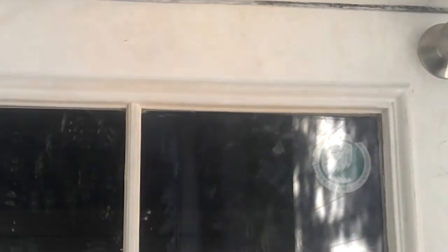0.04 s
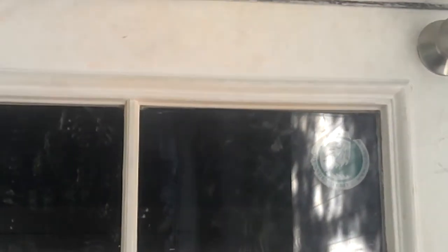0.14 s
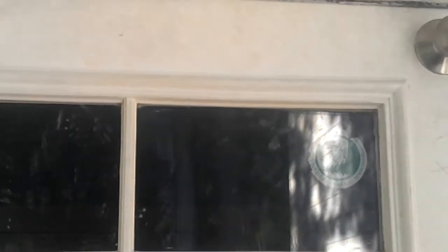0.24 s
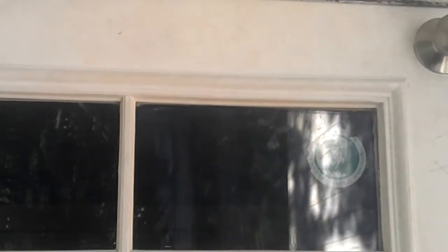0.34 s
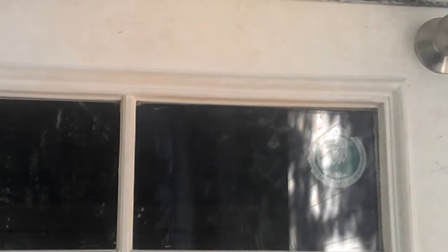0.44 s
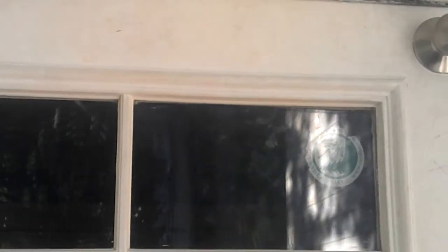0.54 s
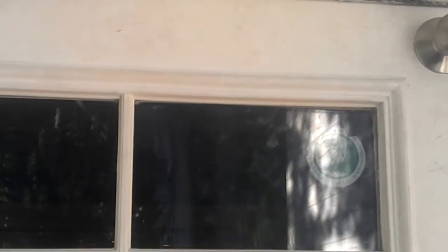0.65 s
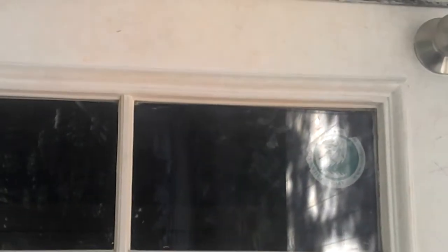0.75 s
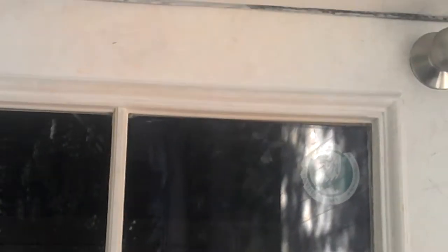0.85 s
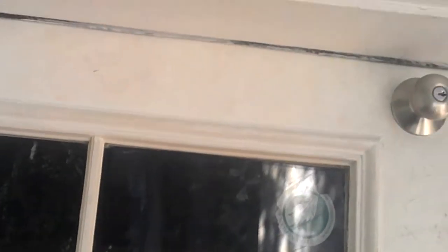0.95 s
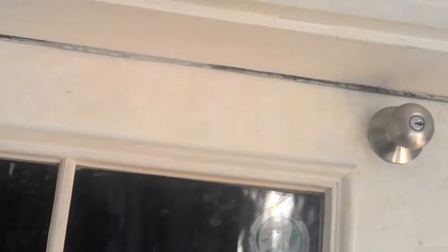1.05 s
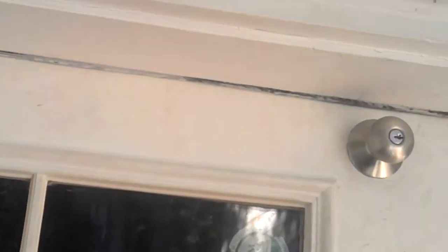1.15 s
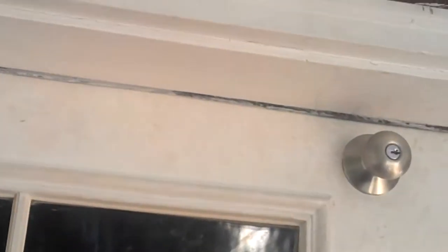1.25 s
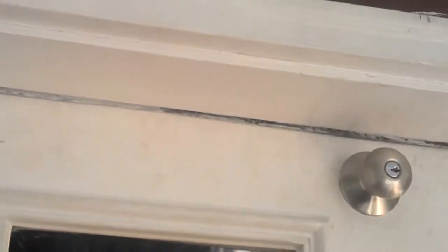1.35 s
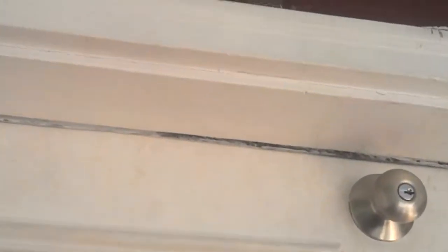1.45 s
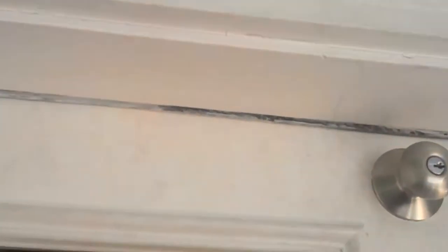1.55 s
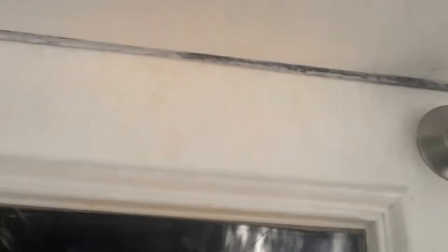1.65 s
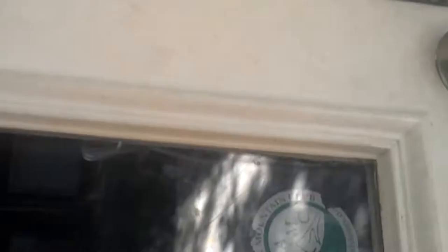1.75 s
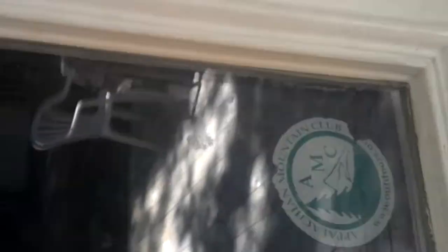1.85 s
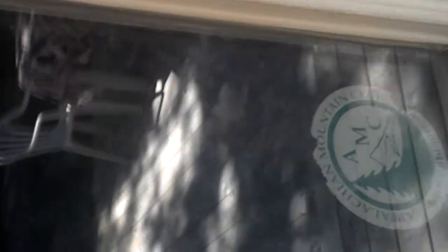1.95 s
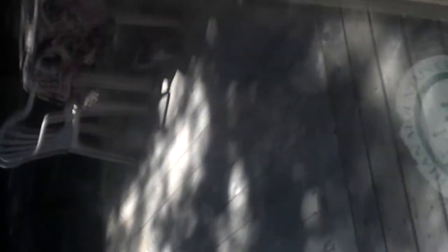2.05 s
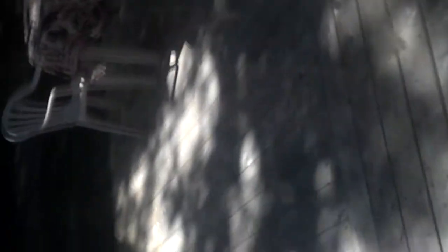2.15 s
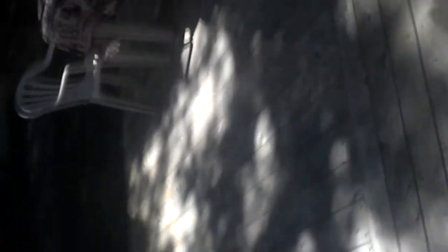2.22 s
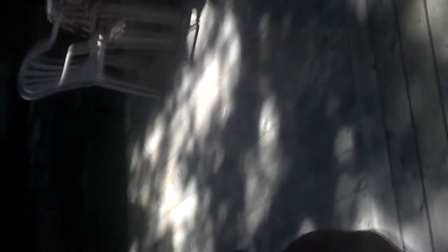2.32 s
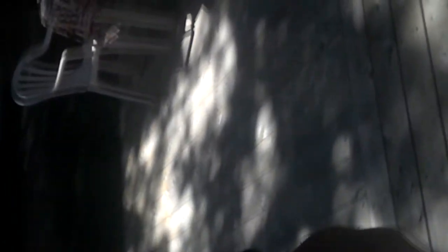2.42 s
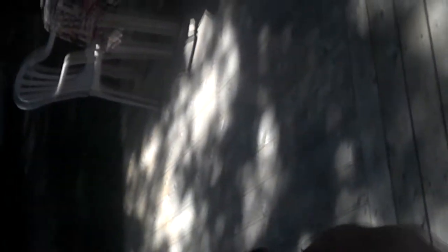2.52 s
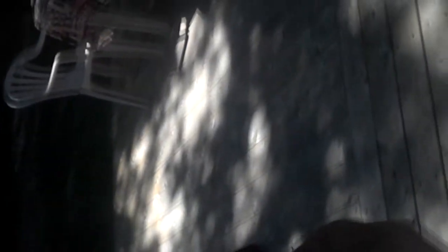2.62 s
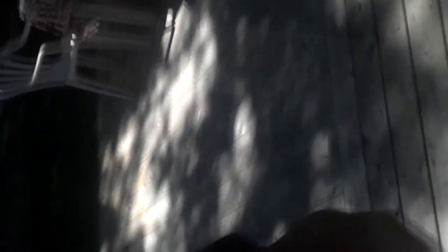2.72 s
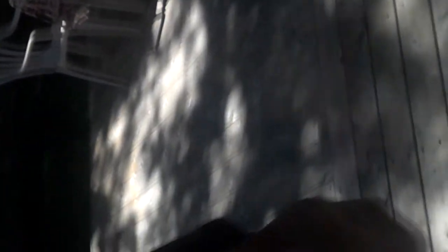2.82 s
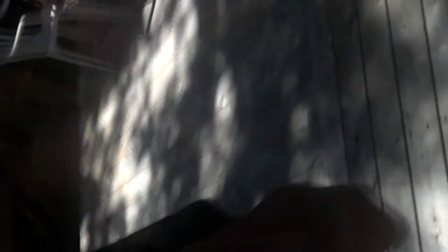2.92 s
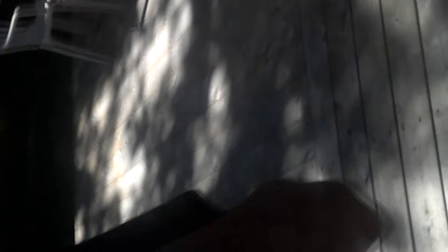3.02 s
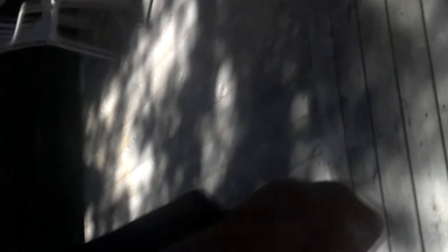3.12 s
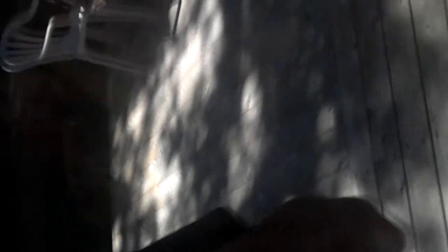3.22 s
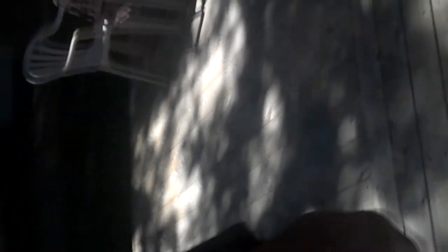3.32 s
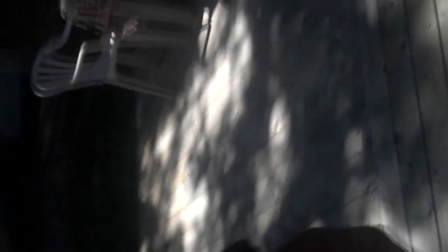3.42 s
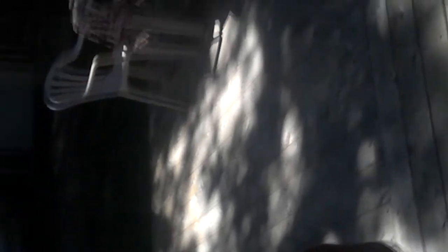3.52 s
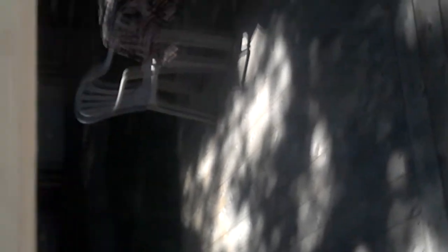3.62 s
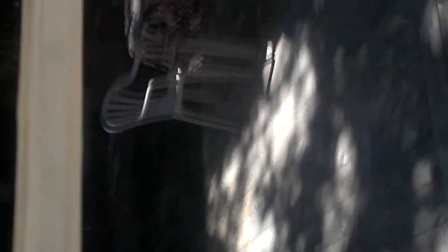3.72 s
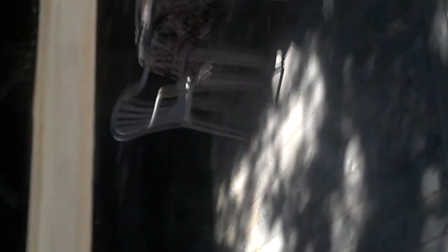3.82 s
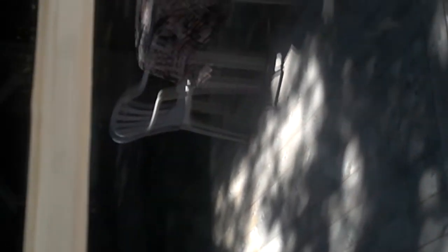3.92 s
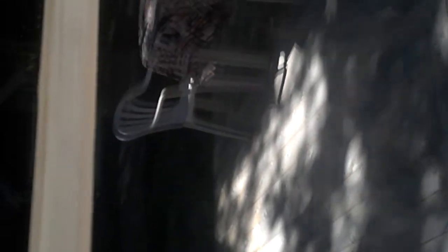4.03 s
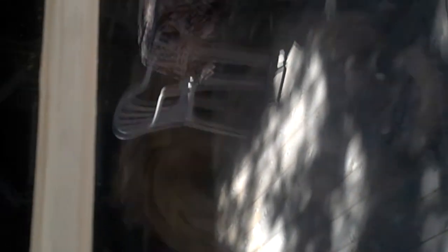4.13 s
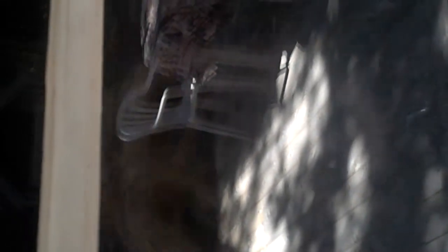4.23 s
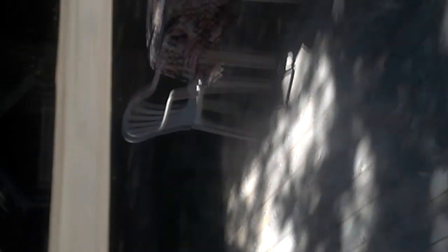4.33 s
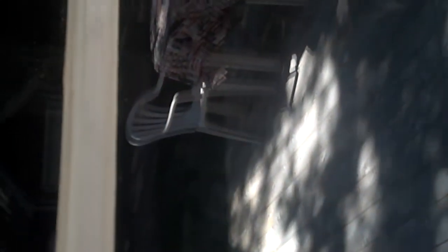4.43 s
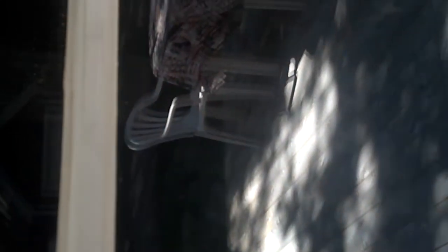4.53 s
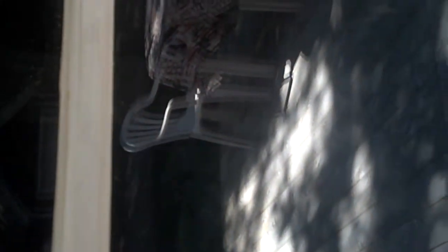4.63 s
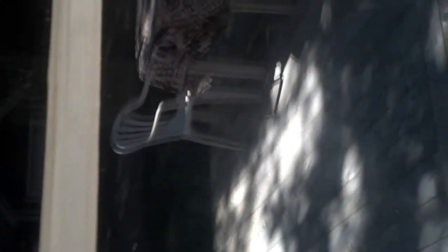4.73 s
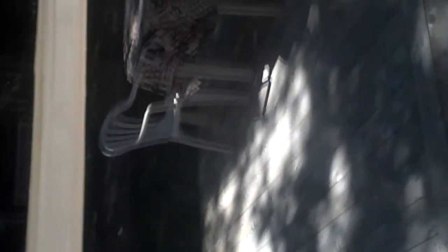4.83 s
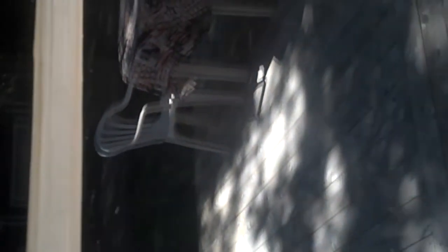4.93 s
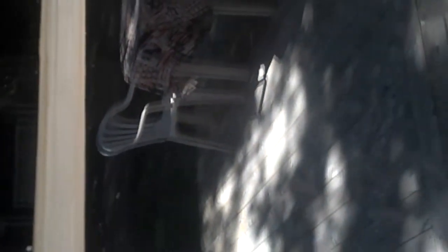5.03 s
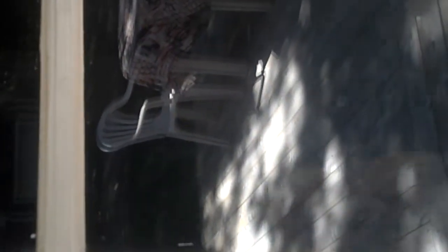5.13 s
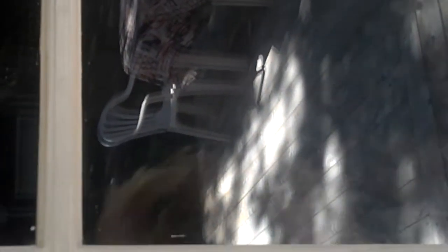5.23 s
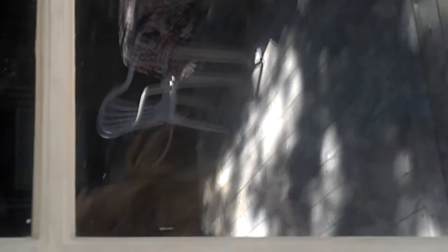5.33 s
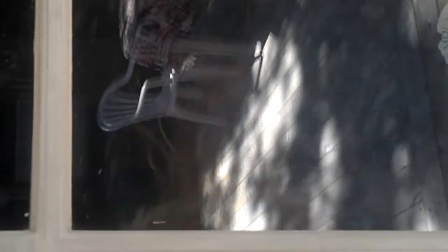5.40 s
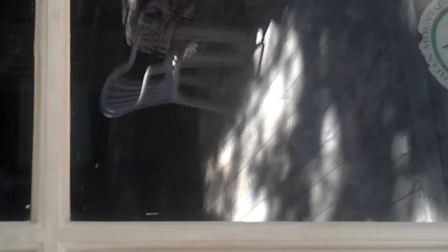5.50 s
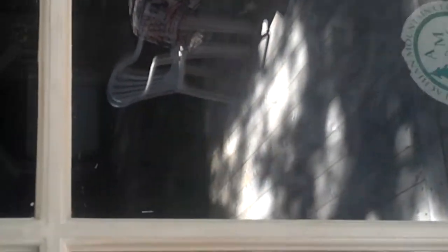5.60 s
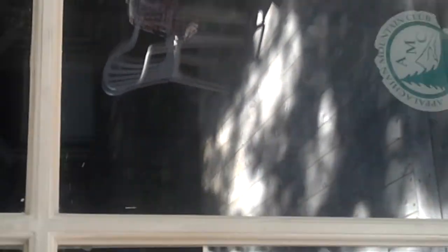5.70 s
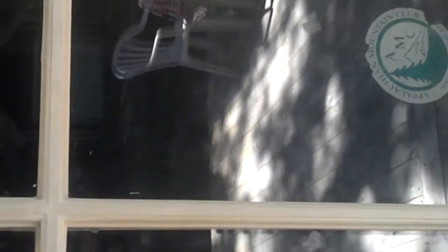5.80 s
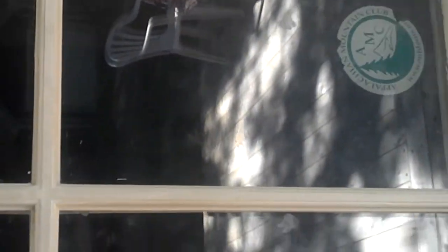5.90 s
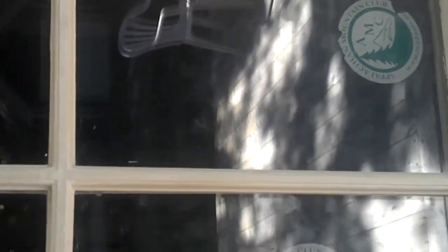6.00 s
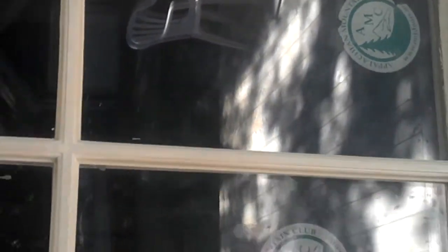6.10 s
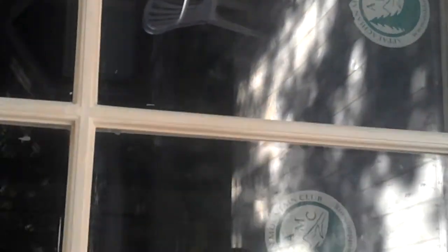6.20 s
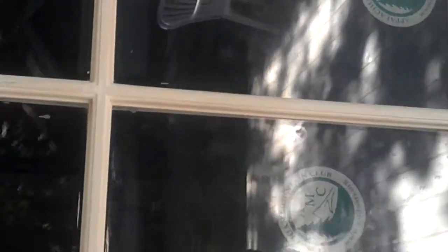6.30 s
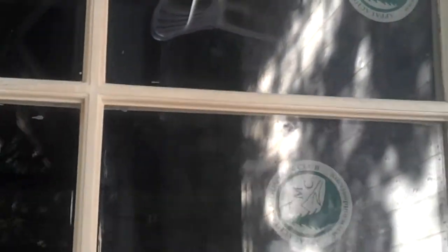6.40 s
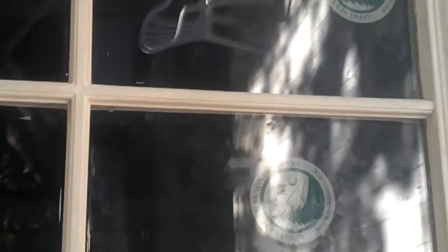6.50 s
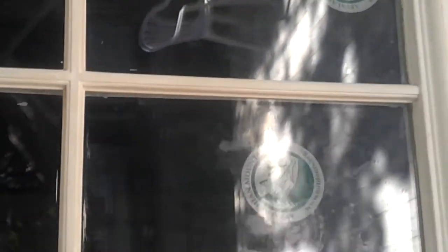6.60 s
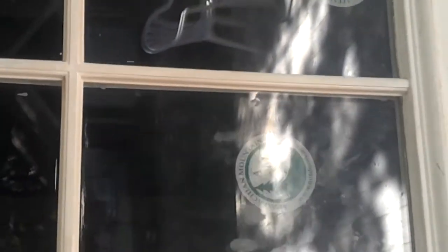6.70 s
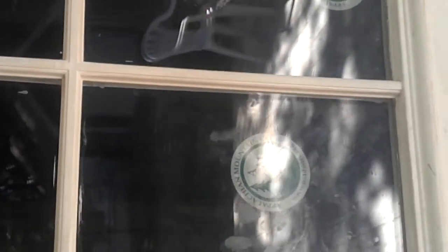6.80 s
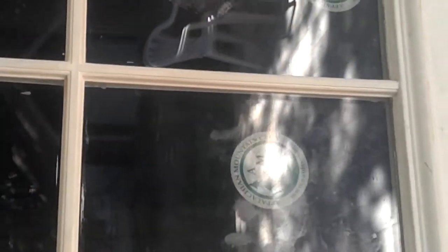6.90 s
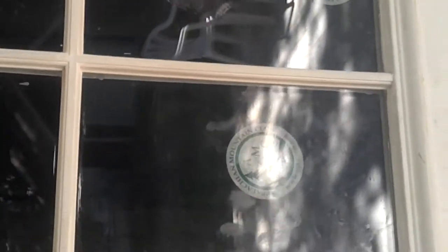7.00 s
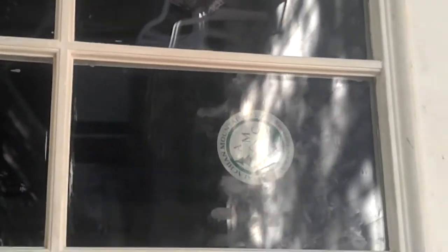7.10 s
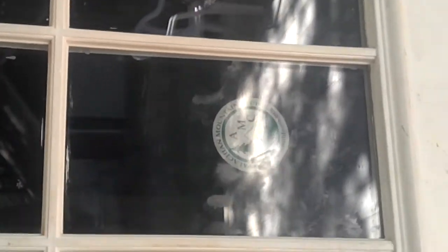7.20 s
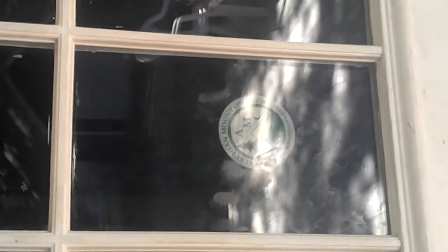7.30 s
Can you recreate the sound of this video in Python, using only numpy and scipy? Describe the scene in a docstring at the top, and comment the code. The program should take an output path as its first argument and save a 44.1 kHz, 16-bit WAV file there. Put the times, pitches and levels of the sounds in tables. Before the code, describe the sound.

A faint, low house rumble runs throughout in a bare room. At about 1.5 seconds a dog's paws thump against a glass-paned door close to the microphone, followed at 1.8 by one short, clear yip with a little room echo. From 2.1 to 2.7 claws click sharply and scrape on glass and wood, with two small whimpers. More scrabbling and dull thumps run from 2.8 to 3.9, starting with a brief pad squeak, and another sharp burst comes from 4.2 to 4.5. Collar tags tinkle very faintly in the pause. From 5.1 to 6.4 comes the longest bout: heavy thumps, claw strikes, dragging scratches that rattle the pane, and a few quick squeaks on the glass. The dog whimpers softly at 6.6, then gives two faint, thin nose whistles and a small high whine between 6.9 and 7.4 seconds.

```python
"""A bare room with a glass-paned door. A dog jumps at it: paws thump, claws strike and drag down pane
and wood, pads squeak on the glass. The dog yips and whines from the throat, its metal collar tags
tinkle, and it whistles thinly through the nose, over the low rumble of the house. The camera widens
its stereo by feeding each microphone port, inverted and slightly late, into the other channel."""
import sys
import numpy as np
from scipy import signal
from scipy.fft import rfft, irfft, next_fast_len
from scipy.io import wavfile
from scipy.ndimage import map_coordinates

SR = 44100
rng = np.random.default_rng(int(sys.argv[2]) if len(sys.argv) > 2 else 0)


def master_out(mix):
    """Clip the mix to full scale and print it as 16-bit PCM to the path in sys.argv[1]."""
    frames = np.transpose(np.atleast_2d(mix))
    ceiling = np.clip(frames, -1, 1)
    pcm = np.round(ceiling * 32767).astype(np.int16)
    wavfile.write(sys.argv[1], SR, pcm)


N = 324132

# glass pane resonances: (centre [Hz], width [Hz], gain [dB])
PANE_MODES = [(1028, 145, -1), (1440, 270, 0), (1864, 290, 4), (2344, 646, 0.5), (4120, 1550, -8)]
# door body resonances: (centre [Hz], width [Hz], gain [dB])
DOOR_MODES = [(129.6, 77, -2.5), (241, 97, 1.5), (435, 242, 1.5), (775, 984, -3)]
# hiss of claw on glass, also of breath: (frequency [Hz], gain [dB])
HISS_SPECTRUM = [(1500, -76), (2800, -5), (4000, -6), (6000, -6), (9000, -15.5), (17000, -31.5)]


def amp(db):
    """Gain of a level in dB."""
    return 10 ** (np.asarray(db) / 20)


def unit(x):
    """x at rms 1."""
    return x / np.sqrt(np.mean(x ** 2) + 1e-20)


def along(points, hz):
    """Interpolate (frequency [Hz], value) points on a log axis."""
    f, v = np.transpose(points)
    return np.interp(np.log(hz + 1), np.log(f + 1), v)


def curves(tables, fade_s=0.0065):
    """A gate open during each table, then each column per sample."""
    t = np.arange(N) / SR
    times, *cols = np.vstack(tables).T
    gate = sum(np.clip(np.minimum(t - rows[0][0], rows[-1][0] - t) / fade_s + 1, 0, 1) for rows in tables)
    return [gate] + [np.interp(t, times, col) for col in cols]


def wobble(knots_per_s):
    """Smooth random curve."""
    knots = rng.standard_normal(int(N * knots_per_s / SR) + 4)
    return map_coordinates(knots, [np.arange(N) * knots_per_s / SR])


def filtered(x, response):
    """x through a complex frequency response."""
    m = next_fast_len(x.shape[-1] + 8192)
    return irfft(rfft(x, m) * response(np.fft.rfftfreq(m, 1 / SR)), m)[..., :x.shape[-1]]


def modes(table):
    """Response of a row of resonances; a heavy body hardly answers far above its top one."""
    top_hz = 1.55 * table[-1][0]
    return lambda f: sum((-1) ** k * amp(db) * 1j * f * width / (hz * hz - f * f + 1j * f * width + 1e-9)
                         for k, (hz, width, db) in enumerate(table)) / (1 + 1j * f / top_hz)


def colour(points):
    """Response of a smooth spectrum."""
    return lambda hz: amp(along(points, hz))


def port_noise():
    """Noise at the two ports: alike in the low mids, unrelated in the treble."""
    # (frequency [Hz], power common to both ports [0-1])
    coherence = [(70, 0.12), (250, 0.9), (600, 0.69), (1000, 0.17), (3000, 0.0057)]

    def split(hz):
        share = np.clip(along(coherence, hz), 0, 1)
        return np.sqrt([share, 1 - share, 1 - share])
    common, *own = filtered(rng.standard_normal((3, N)), split)
    return common + np.array(own)


def room_tone():
    """Steady low rumble and hiss of the house."""
    # (frequency [Hz], gain [dB])
    spectrum = [(35, -4), (70, -10), (130, -2.5), (250, -2.5), (500, -12.5), (1000, -19), (2000, -23.5),
                (5000, -27.5), (15000, -37.5), (15600, -64)]
    return amp(-59.0 + 0.11 * wobble(0.82)) * unit(filtered(port_noise(), colour(spectrum)))


def thumps():
    """Pads and body hit door and floor: a few low cycles that die at once."""
    # (time [s], level [dB], pitch [Hz])
    blows = [(1.514, -22.5, 167), (1.651, -31.5, 166), (2.972, -28, 143), (3.45, -22, 194),
             (3.582, -26.5, 220), (3.828, -24, 231), (3.844, -27.5, 202), (4.533, -27.5, 240),
             (4.915, -28, 228), (5.102, -33, 178), (5.136, -26.5, 131), (5.175, -20.5, 123),
             (5.241, -16, 138), (5.341, -28.5, 106), (5.374, -29.5, 121), (5.583, -20, 170),
             (6.066, -20.5, 283)]
    t60_cycles, rise_s = 8, 0.002
    out, t = np.zeros(N + SR), np.arange(SR // 5) / SR
    for s, db, hz in blows:
        envelope = amp(db - 60 * t * hz / t60_cycles) * (1 - np.exp(-t / rise_s))
        out[round(s * SR):][:len(t)] += envelope * np.sin(2 * np.pi * hz * t)
    return out[:N]


def paw_drag():
    """Pads and claws stick and slip: lumpy friction shakes pane and door and hisses."""
    # (start [s], length [s], pane [dB], claw hiss [dB], door [dB])
    strokes = [(1.548, 0.39, -72.5, -94, -64), (2.149, 0.043, -36.5, -42.5, -41.5),
               (2.209, 0.14, -71, -52, -48), (2.307, 0.25, -45, -45, -58.5), (2.844, .13, -44.5, -51, -52),
               (3.091, 0.049, -49.5, -57, -54.5), (3.17, 0.19, -48, -61.5, -50.5),
               (3.273, 0.061, -43, -44.5, -50.5), (3.321, 0.066, -73, -79, -39.5),
               (3.408, 0.048, -36.5, -46, -44.5), (3.493, 0.066, -45.5, -46, -48),
               (3.552, 0.038, -38.5, -43, -37), (3.587, 0.032, -38, -41.5, -45.5),
               (3.68, 0.081, -58, -59, -50), (4.192, 0.041, -45.5, -45.5, -48),
               (4.228, 0.067, -42, -74.5, -44), (4.336, 0.086, -41, -46.5, -48),
               (4.389, 0.097, -38, -43.5, -45.5), (4.682, 0.13, -66.5, -65, -61),
               (5.29, 0.24, -59, -59.5, -56), (5.478, 0.085, -41, -42, -45.5),
               (5.549, 0.12, -34, -39.5, -38), (5.668, 0.057, -44, -41.5, -36.5),
               (5.711, 0.18, -41, -74, -48), (5.886, 0.08, -42, -66, -51), (5.951, 0.19, -39.5, -56, -45.5),
               (6.078, 0.1, -41.5, -64, -41.5), (6.15, 0.16, -44, -64, -50), (6.269, 0.16, -43, -49, -42)]
    build_share, squareness = 0.44, 1.85
    snags_per_s, snag_s = 250, .002
    t = np.arange(N) / SR
    pressure = np.zeros((3, N))
    for start, length, *db in strokes:
        at = slice(round(start * SR), round((start + length) * SR))
        from_peak = np.interp(t[at] - start, [0, build_share * length, length], [-1, 0, 1])
        pressure[:, at] += amp(db)[:, None] * (1 - abs(from_peak) ** squareness)
    snags = (rng.random(N) < snags_per_s / SR) * rng.exponential(size=N)
    jerks = 1 + .36 * signal.lfilter([1], [1, -np.exp(-1 / (snag_s * SR))], snags)
    slips = jerks * amp(0.99 * wobble(90) + 1.2 * wobble(400)) * port_noise()

    def shaken(body, waver_db):  # the sliding paw wakes each resonance unevenly
        return sum((-1) ** k * amp(waver_db * wobble(25)) * filtered(slips, modes([mode]))
                   for k, mode in enumerate(body))
    ring = shaken(PANE_MODES, waver_db=2.2)
    rasp = filtered(amp(1.2 * wobble(820)) * slips, colour(HISS_SPECTRUM))
    rumble = shaken(DOOR_MODES, waver_db=3)
    return sum(p * unit(layer) for p, layer in zip(pressure, (ring, rasp, rumble)))


def claw_strikes():
    """A claw lands: sharp click, short rattle of the pane, duller knock of the door."""
    # (time [s], click [dB], pane [dB], door [dB])
    strikes = [(1.649, -89, -70, -47.5), (1.9233, -46, -41, -45), (1.957, -53, -47.5, -41),
               (2.1594, -31.5, -32, -60), (2.2147, -32.5, -34, -37), (2.4865, -15.5, -26.5, -31),
               (2.494, -25, -24.5, -39.5), (2.5572, -30, -46, -35), (2.631, -45, -43.5, -37.5),
               (2.8927, -65, -41, -28.5), (3.012, -63, -52.5, -49.5), (3.112, -43, -42.5, -55),
               (3.353, -60, -41.5, -39.5), (3.421, -40, -32, -43), (3.429, -53, -36.5, -42),
               (3.472, -50, -36.5, -39), (3.498, -45, -30.5, -42), (3.5605, -35.5, -32.5, -48),
               (3.7038, -44, -54, -62), (3.8272, -49.5, -57, -42.5), (3.9106, -83, -86, -43.5),
               (4.1953, -23, -60, -44), (4.2344, -38, -33, -35.5), (4.256, -11.5, -32.5, -64),
               (4.289, -38, -67, -56), (4.329, -35.5, -42.5, -45.5), (4.369, -36.5, -36, -51),
               (4.4008, -25.5, -41, -20), (4.443, -31.5, -40, -41), (4.525, -50, -57, -44.5),
               (4.9225, -46.5, -60, -55.5), (5.1613, -28, -33, -36.5), (5.221, -22.5, -38, -42.5),
               (5.2404, -47, -40.5, -39.5), (5.2505, -25, -45, -80), (5.4145, -23.5, -36, -43.5),
               (5.462, -30.5, -59, -40), (5.489, -26, -61, -58), (5.5458, -20.5, -23, -34.5),
               (5.583, -36.5, -31, -46), (5.975, -49, -41.5, -56), (6.092, -57, -33.5, -30.5),
               (6.219, -57, -29, -45), (6.287, -49, -36, -34), (6.4, -40.5, -39, -43.5)]
    # claw tip landing: (frequency [Hz], gain [dB])
    click_spectrum = [(1500, -43), (3000, 1.5), (5000, 1), (8000, -1.5), (11000, -12), (17000, -27.5)]
    tip_db, tip_delay_s, kick_db = 10, 0.000858, 14  # single pulses, over the noise bursts
    t = np.arange(SR // 5) / SR
    burst = lambda t60_s, rise_s: amp(-60 * t / t60_s) * (1 - np.exp(-t / rise_s))
    tip, click, pane, door, pane_kick, door_kick = np.zeros((6, N + SR))
    for s, click_db, pane_db, door_db in strikes:
        at = slice(round(s * SR), round(s * SR) + len(t))
        tip[at.start + round(tip_delay_s * SR)] = amp(click_db + tip_db)
        pane_kick[at.start], door_kick[at.start] = amp([pane_db + kick_db, door_db + kick_db])
        click[at] += amp(click_db) * (burst(0.008, 0.002) + 0.51 * burst(0.038, 0.0019))
        pane[at] += amp(pane_db) * burst(.06, .0006)
        door[at] += amp(door_db) * burst(.075, .0015)
    noise = port_noise()

    def struck(pulse, envelope, response):
        return filtered(pulse[:N] + envelope[:N] * noise, response) / filtered(noise, response).std()
    return (struck(tip, click, colour(click_spectrum))
            + struck(pane_kick, pane, modes(PANE_MODES))
            + struck(door_kick, door, modes(DOOR_MODES)))


def yips_and_whines():
    """Vocal-fold harmonics and a puff of noise each cycle, shaped by the throat."""
    # one contour per call: (time [s], pitch [Hz], level [dB], overtones [dB])
    contours = [
        [(1.797, 520, -57, 17.5), (1.806, 634.5, -40, 12.5), (1.818, 684.8, -26, 0), (1.832, 677.5, -23.5, 2),
         (1.84, 747, -19.5, -5.5), (1.863, 751.5, -22, -12), (1.874, 663, -29, 8), (1.905, 674.7, -32.5, 5.5),
         (1.925, 636, -62, 8)],
        [(2.216, 540.5, -49.5, 17), (2.265, 579.6, -47, 15), (2.285, 691.7, -47, 15), (2.312, 676, -44, 10),
         (2.335, 575.6, -39, 1.5)],
        [(2.585, 383, -38.5, -20), (2.605, 384.2, -32.5, -6), (2.63, 390.6, -52, -20)],
        [(6.612, 554, -48, 3.5), (6.632, 568, -46.5, 15), (6.646, 615, -42, 3), (6.656, 568.5, -45, 8.5),
         (6.668, 535, -42.5, 0), (6.69, 516.6, -65, 8)],
        [(7.275, 766, -76.5, -16), (7.287, 800, -50, -11), (7.32, 910, -45.5, -17), (7.35, 899, -47, -14)],
    ]
    # per call: (starting roughness [0-1], growth [1/s])
    hoarseness = [(.15, 2.5), (.16, 1), (.08, .5), (.1, 4.5), (.04, 0)]
    # half-shut mouth, per call: (gain above the octave [dB])
    muffle_db = [-0.5, -3, -0.5, -2, -1]
    # throat resonances: (centre [Hz], width [Hz], gain [dB])
    throat_modes = [(753, 193, 5.5), (1390, 234, 2.5), (1930, 520, -2.5), (3120, 920, 1.5),
                    (4200, 1700, -14)]
    throat = modes(throat_modes)
    calls = [[(*row, rough + growth * (row[0] - rows[0][0]), mouth_db) for row in rows]
             for rows, (rough, growth), mouth_db in zip(contours, hoarseness, muffle_db)]
    gate, hz, db, overtone_db, rough, mouth_db = curves(calls)
    rough = np.clip(rough, 0, 1)
    phase = 2 * np.pi * np.cumsum(hz * (1 + .1 * rough * wobble(200))) / SR
    # a rough voice loses its upper overtones to noise
    overtones = sum(abs(throat(k * hz)) * amp(mouth_db * (k > 2)) * (1 - rough) ** (1.8 * (k - 2))
                    * np.sin(k * phase) for k in range(2, 9))
    tone = np.sin(phase) + amp(overtone_db) * overtones
    puffs = (1 + np.cos(phase)) * rng.standard_normal(N)
    breath = unit(filtered(puffs, lambda f: throat(f) ** 2))
    breath += amp(-23.5) * unit(filtered(puffs, colour(HISS_SPECTRUM)))
    envelope = gate * amp(db + 3.5 * rough * wobble(87))
    return envelope * (np.sqrt(1 - rough) * tone + .48 * np.sqrt(rough) * breath)


def pad_squeaks():
    """A pad chatters on the glass at an unsteady, sinking rate; the pane rings on briefly."""
    # (time [s], level [dB], pitch [Hz], length [s])
    squeaks = [(2.859, -42, 1014, 0.01), (2.874, -35.5, 1900, 0.015), (5.551, -26, 1652, 0.0081),
               (5.684, -23.5, 1384, 0.015), (5.915, -33, 1478, 0.0086)]
    attack_s, t60_s, sag_per_s = 0.001, 0.057, 0.37
    out, t = np.zeros(N + SR), np.arange(SR // 8) / SR
    shake = wobble(500)
    for s, db, hz, length in squeaks:
        at = slice(round(s * SR), round(s * SR) + len(t))
        phase = 2 * np.pi * np.cumsum(hz * (1 - sag_per_s * t + 0.05 * shake[at])) / SR
        envelope = np.clip(t / attack_s, 0, 1) * amp(-60 * np.clip(t - length, 0, 1) / t60_s)
        out[at] += amp(db + 2.1 * shake[at][::-1]) * envelope * (np.sin(phase) + 0.15 * np.sin(phase / 2))
    return out[:N]


def collar_tags():
    """Small metal plates ring at new strengths on each touch and waver as they swing."""
    # (time [s], level [dB])
    touches = [(4.592, -57.5), (4.65, -60), (4.875, -61)]
    # (frequency [Hz], gain [dB], t60 [s])
    plate_modes = [(5900, 0, .2), (6400, -3, .12)]
    out, t = np.zeros(N + SR), np.arange(SR // 2) / SR
    swing_rad = 4 * wobble(120)
    for s, level_db in touches:
        at = slice(round(s * SR), round(s * SR) + len(t))
        for hz, db, t60_s in plate_modes:
            envelope = amp(level_db + db + rng.normal(0, 2.1) - 60 * t / t60_s)
            out[at] += envelope * np.sin(2 * np.pi * hz * t + swing_rad[at])
    return out[:N]


def nose_whistles():
    """A thin nasal tone with a weak octave slides up to pitch and fades, in a rush of air."""
    # (start [s], pitch [Hz], level [dB])
    whistles = [(6.945, 4740, -59), (7.243, 4730, -55.5)]
    scoop_share, scoop_s, fade_db_per_s = 0.032, 0.012, 127.5
    out, t = np.zeros(N + SR), np.arange(SR // 4) / SR
    opened = np.clip(t / scoop_s, 0, 1)
    for s, hz, db in whistles:
        phase = 2 * np.pi * np.cumsum(hz * (1 - scoop_share * (1 - opened))) / SR
        tone = np.sin(phase) + 0.23 * np.sin(2 * phase)
        air = amp(-9) * unit(filtered(rng.standard_normal(len(t)), colour(HISS_SPECTRUM)))
        out[round(s * SR):][:len(t)] += opened * amp(db - fade_db_per_s * t) * (tone + air)
    return out[:N]


def room_reverb(x):
    """Wall reflections: one noise tail per port, dying faster in the treble."""
    # (frequency [Hz], t60 [s])
    decay_times = [(200, 0.71), (1000, 0.44), (10000, 0.21)]
    hz, t, spectra = signal.stft(port_noise()[:, :SR], SR, nperseg=256)
    tail = signal.istft(spectra * amp(-60 * t / along(decay_times, hz)[:, None]), SR, nperseg=256)[1]
    tail /= np.linalg.norm(tail[0])
    return signal.fftconvolve(np.broadcast_to(x, (2, N)), tail, axes=1)[:, :N]


def scene():
    """The door is near and fairly dry; the dog's voice fills the room."""
    # the camera body shades the door's treble from the right port
    shade = lambda hz: amp([[1.5], [4.5]] - [[0], [8]] * np.clip(np.log2(hz / 350 + 1e-9), 0, 1))
    door = filtered(paw_drag() + claw_strikes() + pad_squeaks(), shade) + thumps() * amp([[2.5], [-18]])
    dog = yips_and_whines() + nose_whistles() + collar_tags()
    reverb = room_reverb(amp(-14.5) * door + amp(-8.5) * dog)
    return door + dog * amp([[-2.5], [-9]]) + reverb + room_tone()


def record(dry):
    """More sensitive left port, bass cut, delayed and inverted crossfeed, band limit."""
    bass_cut_hz, top_hz = 31, 17000
    cross_gain, cross_delay_s = 1.363, 16 / SR
    ports = filtered(dry * amp([[2.5], [-2.5]]), lambda hz: (1j * hz / (bass_cut_hz + 1j * hz)) ** 2)
    wide = ports - cross_gain * filtered(ports[::-1], lambda hz: np.exp(-2j * np.pi * hz * cross_delay_s))
    return filtered(amp(-3.0) * wide, lambda hz: hz < top_hz)


dry = scene()
out = record(dry)
master_out(out)
```